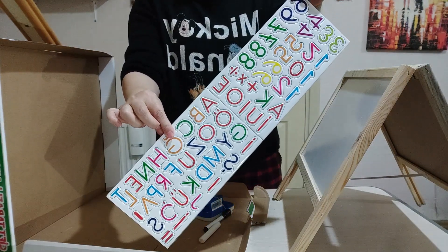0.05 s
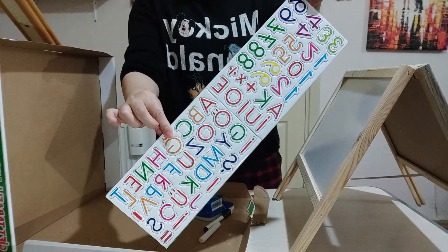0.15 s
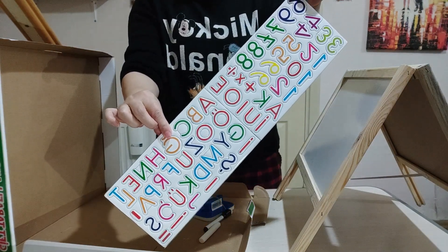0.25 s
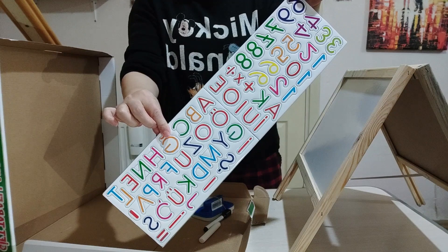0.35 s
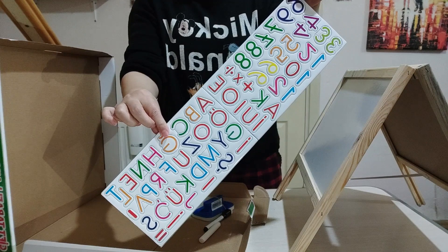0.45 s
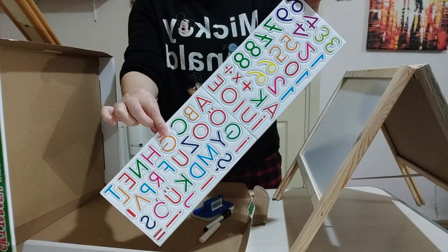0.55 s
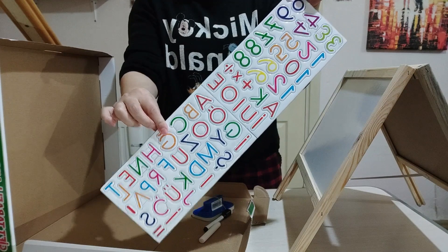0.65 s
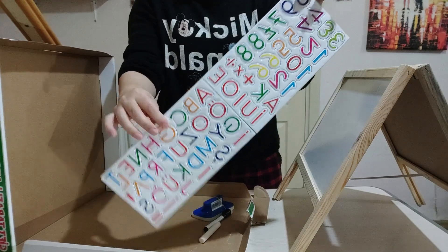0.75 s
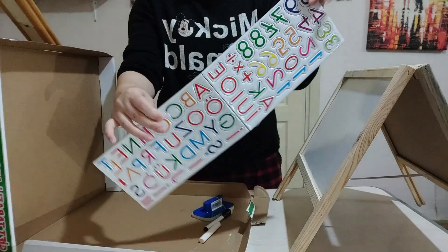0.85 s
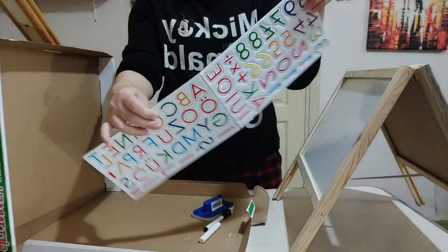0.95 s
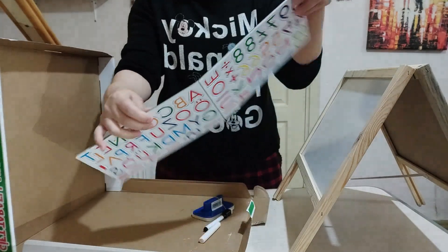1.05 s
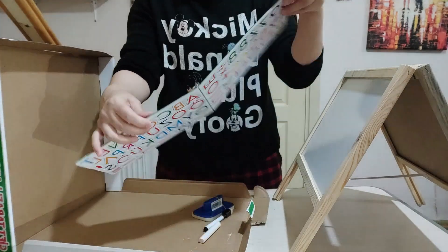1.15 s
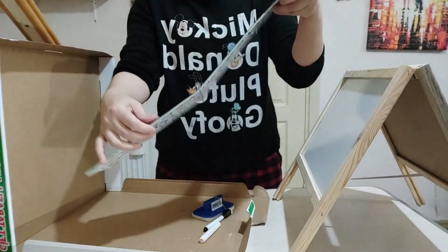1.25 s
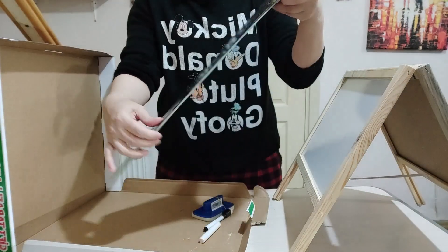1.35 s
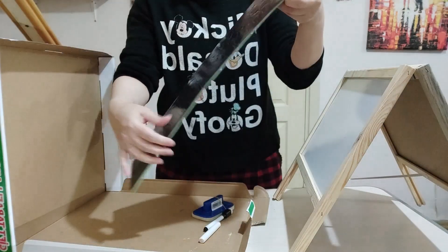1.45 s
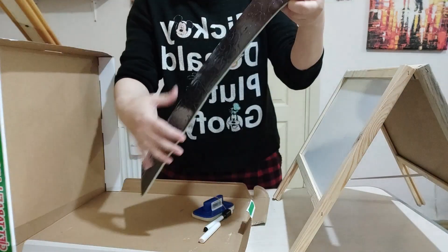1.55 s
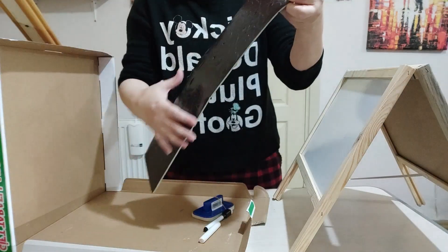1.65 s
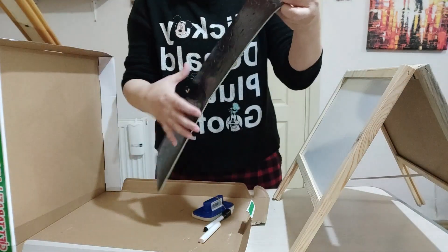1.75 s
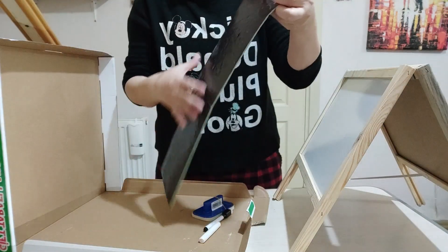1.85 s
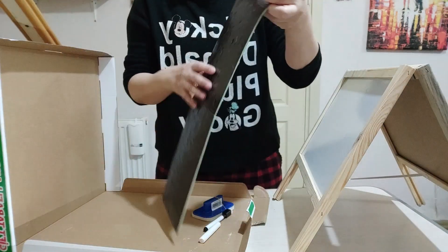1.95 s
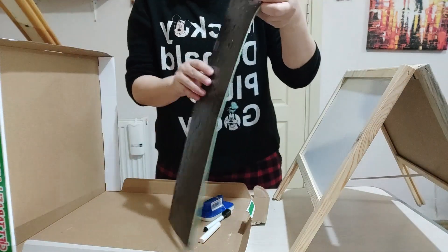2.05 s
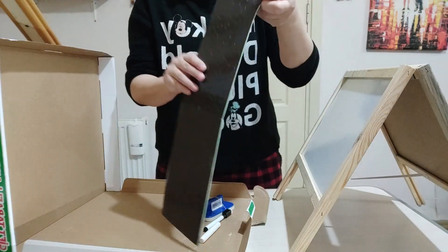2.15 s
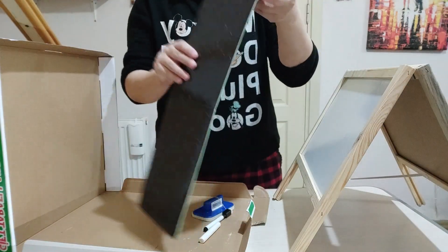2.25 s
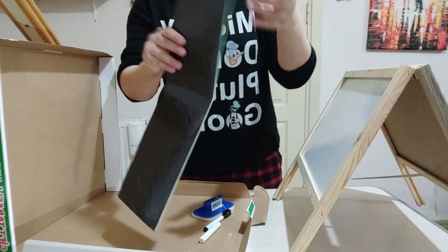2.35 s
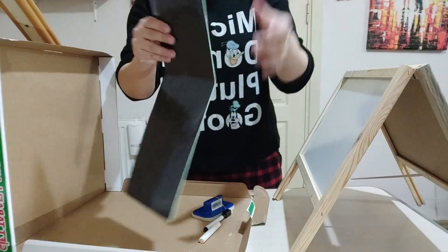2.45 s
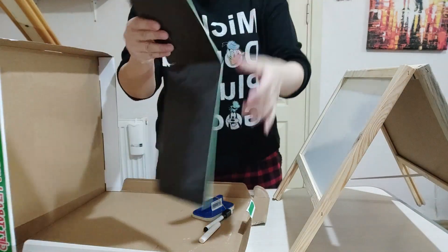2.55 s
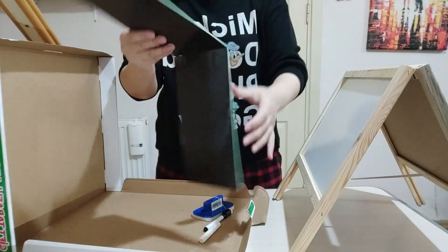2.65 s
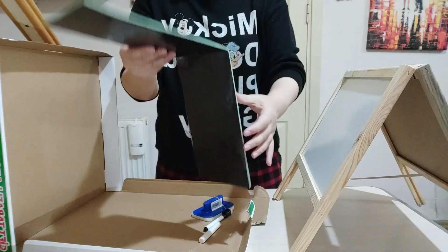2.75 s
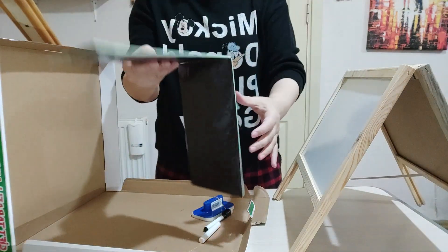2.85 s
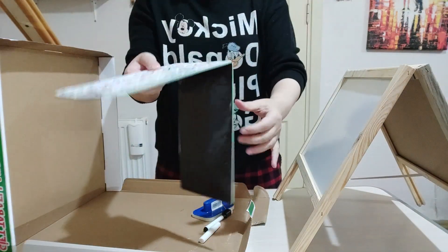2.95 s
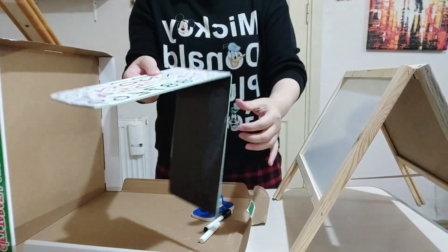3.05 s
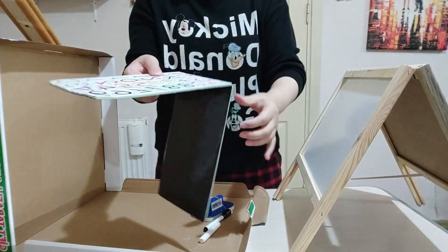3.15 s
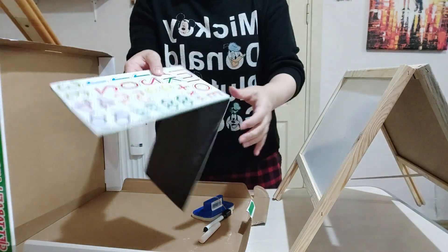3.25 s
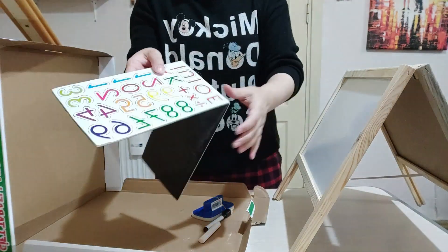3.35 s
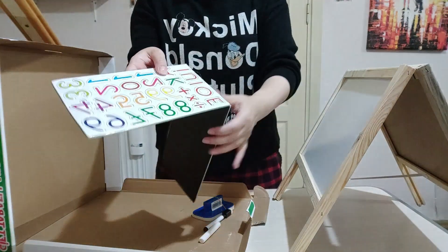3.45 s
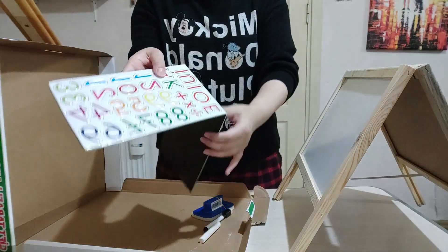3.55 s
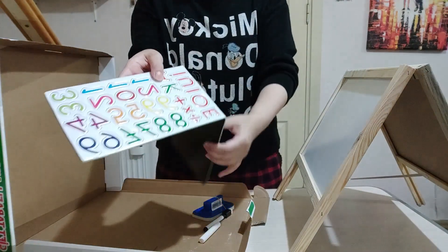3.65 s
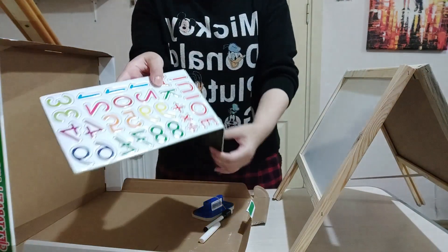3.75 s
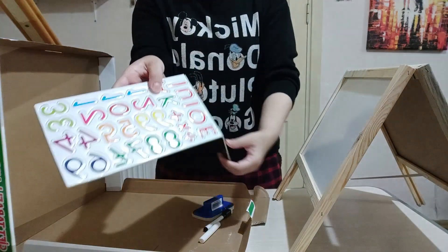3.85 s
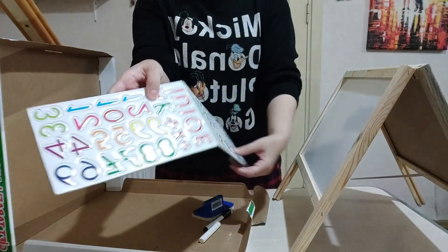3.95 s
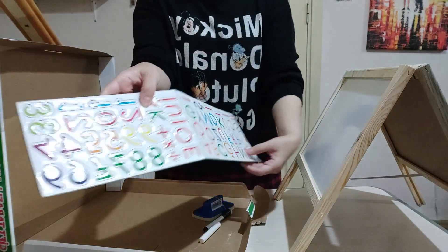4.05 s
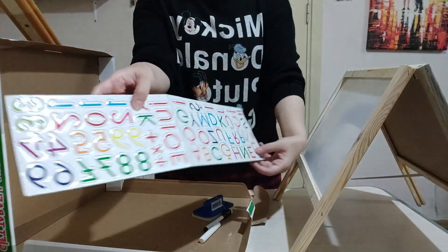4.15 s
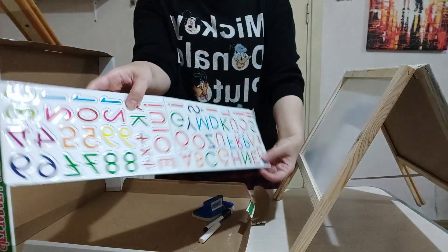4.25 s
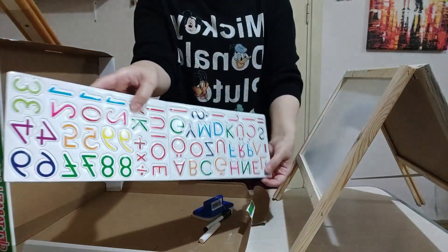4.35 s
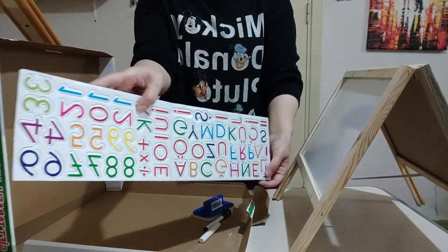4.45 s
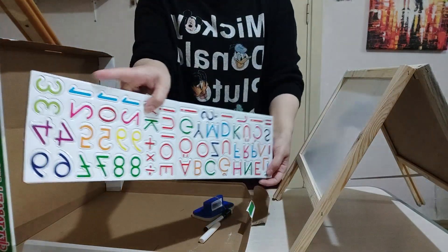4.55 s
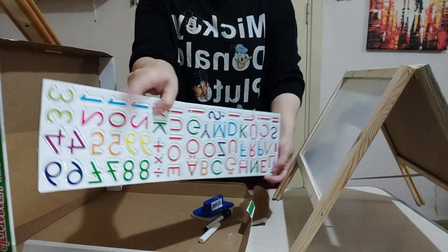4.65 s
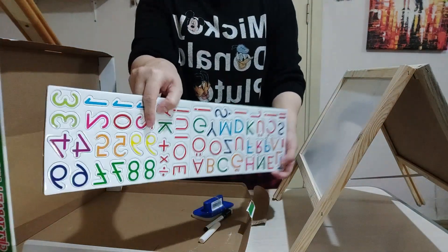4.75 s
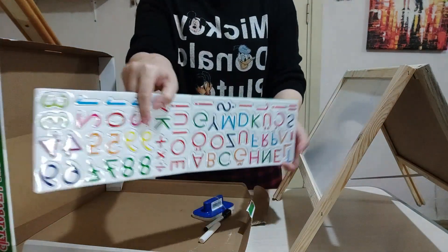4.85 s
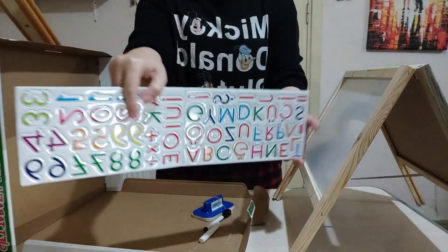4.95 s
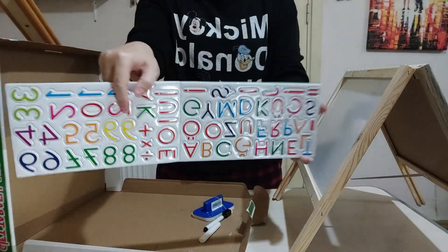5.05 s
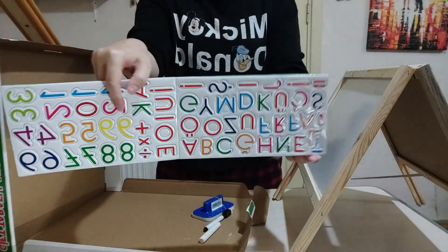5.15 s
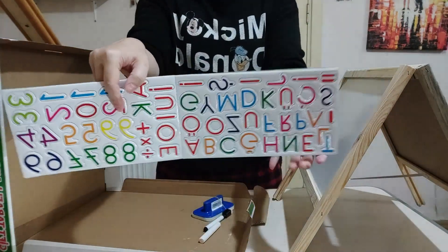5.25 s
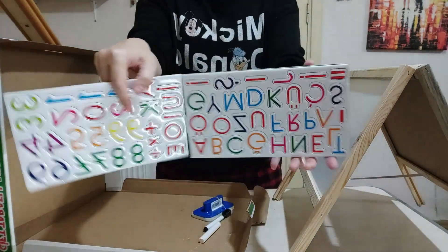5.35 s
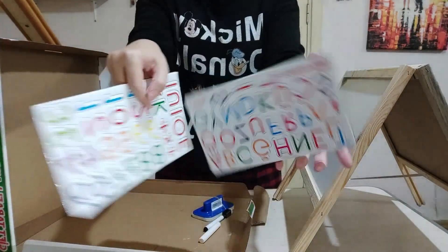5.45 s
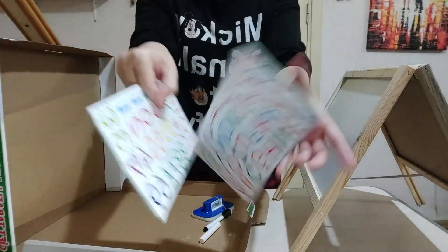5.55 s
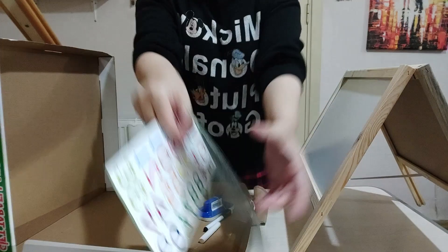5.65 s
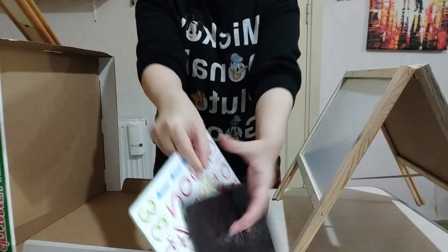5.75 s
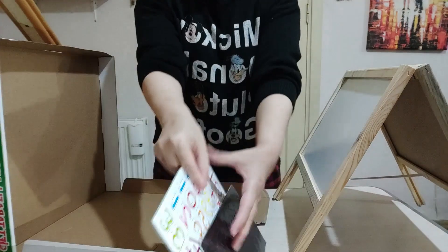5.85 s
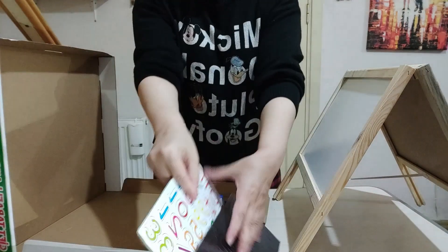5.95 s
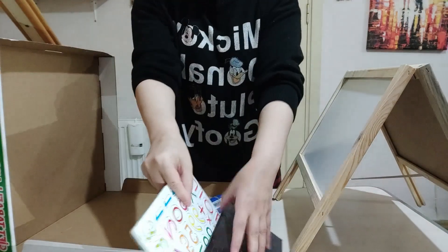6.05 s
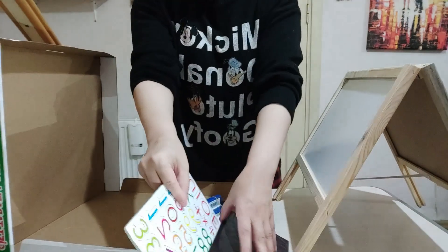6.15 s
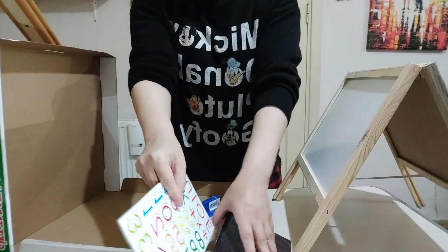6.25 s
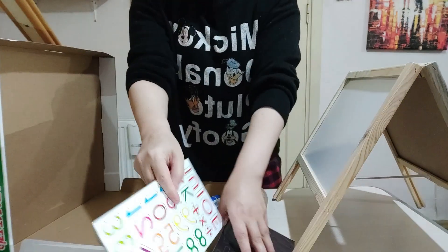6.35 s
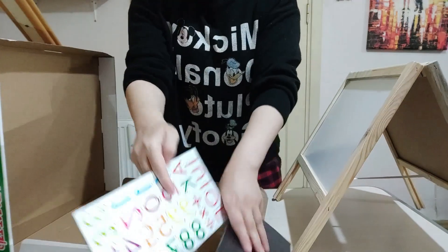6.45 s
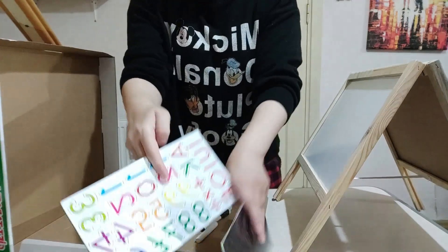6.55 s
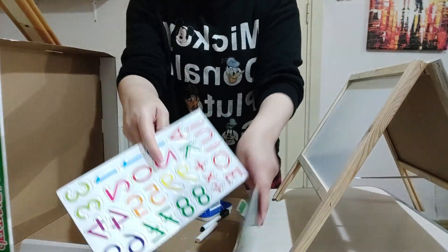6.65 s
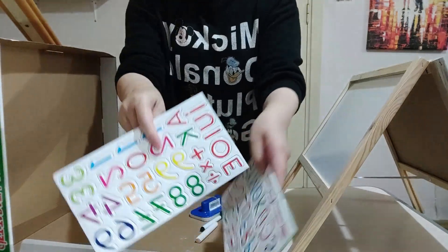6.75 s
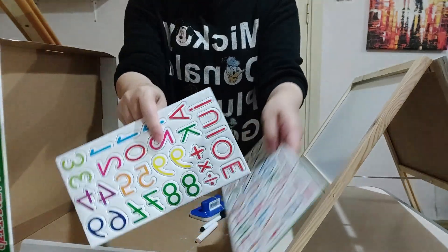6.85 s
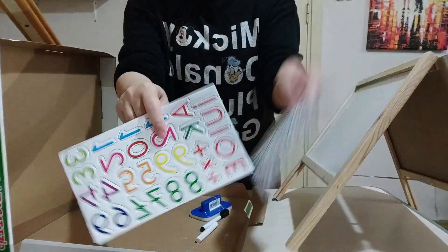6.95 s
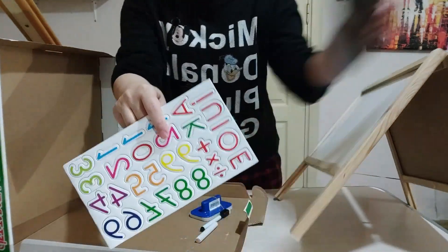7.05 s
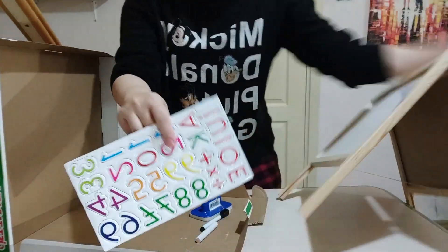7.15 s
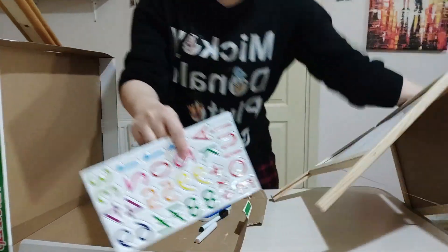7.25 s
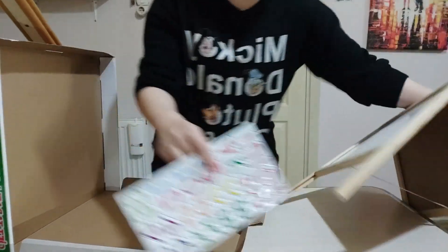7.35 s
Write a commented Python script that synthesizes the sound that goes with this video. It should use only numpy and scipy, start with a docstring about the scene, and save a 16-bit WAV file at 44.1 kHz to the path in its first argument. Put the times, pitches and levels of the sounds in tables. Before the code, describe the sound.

A small, quiet room with low air rumble, faint hiss and a barely audible wavering hum from about 2 s, heard through two closely spaced microphones. From 0.9 s fingers slide over a floppy magnetic sheet in thin, bright, very soft hisses, with tiny ticks around 2.1-3.4 s. From 4 s the rubbing becomes slightly busier, with a faint drag and a tiny high squeak near 4.6 s. At 5.43 s comes a crisp double tap with a soft thump. At 5.8-5.95 s the sheet meets the box: snappy taps, a short rasp and the deepest dull thuds. Softer rubbing, scrapes and brief squeaks continue from 6 to 6.8 s, with light taps near 6.75 s. After a lull, a soft bump at 7.07 s and knocks at 7.2 s lead to a strong thump at 7.33 s and a sharp, bright easel clack at 7.35 s, echoing briefly.

```python
"""You hear light taps and soft thumps, fingers hissing, an edge scraping, short squeaks, a knock and a clack.
Hands turn over a floppy magnetic sheet, set it down in a cardboard box on a table and shift a wooden easel.
Blows are short bursts of noise or fading tones; sliding is noise made of tiny slips; squeaks are gliding tones.
A small, quiet room answers with echoes over its rumble, hiss and a faint hum.
It is all heard through two closely spaced microphones."""
import sys
import numpy as np
from scipy import signal
from scipy.fft import rfft, irfft
from scipy.io import wavfile
from scipy.ndimage import uniform_filter1d

SR = 44100
rng = np.random.default_rng(int(sys.argv[2]) if len(sys.argv) > 2 else 0)


def unload_audio(sound):
    """Save the sound as a 16-bit wav file, at the path given as the first command line argument."""
    columns = np.transpose(np.atleast_2d(sound))
    # keep every value between -1 and 1, then stretch to whole-number steps
    steps = np.round(np.clip(columns, -1, 1) * 32767)
    wavfile.write(sys.argv[1], SR, steps.astype(np.int16))


N = 326340  # length of the scene in samples

# Light blows of sheet, fingers and easel. Each row: start in seconds, hollow clack level in dB,
# bright crack level in dB, crack tilt in dB per octave above 1000 Hz, crack decay in seconds,
# left-minus-right level in dB.
LIGHT_BLOWS = [(2.1259, -89, -59.5, -4.5, 0.0024, -1.5), (2.359, -71, -58, -6.5, 0.0027, -1),
               (2.7953, -85, -60.5, -3.5, 0.005, -1), (3.411, -58.5, -53.5, -5.5, .003, -2),
               (4.629, -67.5, -63, -5, 0.0036, -2), (4.717, -68, -70, -8, 0.0053, -2),
               (4.883, -69, -66, -3, 0.0093, 3), (4.923, -65, -62, 5, 0.0029, 0),
               (5.030, -64.5, -66, -2, 0.0033, -1), (5.311, -61.5, -64, -2, 0.0016, -3),
               (5.4258, -38.5, -38.5, 0.5, 0.00092, -4), (5.4455, -41.5, -45.5, -4, 0.00067, -3),
               (5.474, -71, -53, -3, 0.0052, 8), (5.509, -78, -56, 9, 0.0064, -8),
               (5.552, -59.5, -48.5, 4, .014, 0), (5.620, -66.5, -52.5, 3.5, 0.0035, -4),
               (5.657, -68, -51.5, 5, .01, -3), (5.7967, -37, -46.5, -3, 0.0049, -1),
               (5.8221, -39, -37, 2, 0.001, -5.5), (5.858, -71, -46.5, 10, 0.007, -4),
               (5.924, -52, -41, -7, 0.005, -2), (6.047, -52.5, -59, 5, 0.0071, -4),
               (6.116, -54.5, -61, 12, 0.0044, -5), (6.377, -57, -53, 6, 0.0071, -4.5),
               (6.623, -76, -58, 2, 0.0043, -8), (6.7276, -55, -70, 4, 0.0055, 1),
               (6.752, -50.5, -59, 2, 0.016, -1), (6.79, -47, -55, -9, 0.0044, -1),
               (7.057, -69, -49, -4.5, 0.01, -1), (7.101, -72, -45, -5.5, 0.041, -1),
               (7.1983, -41.5, -40, -1.5, 0.0074, 2.5), (7.2259, -53, -38, -0.5, 0.0045, 1),
               (7.322, -52, -42.5, 4, 0.0026, 2), (7.329, -39.5, -45.5, 5, 0.0093, -6.5),
               (7.3531, -46, -26.5, 12, 0.0015, -0.5), (7.356, -46, -49, -4, 0.001, -11),
               (7.366, -44, -49, 17, 0.0074, 2)]
# Spectra of the hollow clack and the bright crack. Each row: frequency in Hz, relative level in dB.
CLACK_SPECTRUM = [(150, -11), (400, -4.5), (750, -3), (1150, -4), (1900, -7), (2800, -8), (4500, -5.5),
                  (9000, -52)]
CRACK_SPECTRUM = [(1000, -17.5), (2500, -7.5), (3500, 0), (4800, 9.5), (6300, 1), (7900, 6), (9000, -6.5),
                  (13000, -15.5), (16000, -20)]
BLOW_S = 0.02  # a blow's level in dB is its energy spread over this many seconds
RATTLE, RATTLE_S = 0.19, 0.015  # chatter after a light blow: share of the start, decay in seconds

# Heavy, soft blows. Each row: start in seconds, level in dB, pitch of the flexing panel in Hz,
# decay in seconds, ring of box and table in dB against the flex (before ring_db is added),
# left-minus-right level in dB.
HEAVY_BLOWS = [(5.312, -62, 298, 0.0027, -19, 0), (5.4274, -39, 343, 0.0041, -21.5, 1.5),
               (5.735, -55, 154, 0.0087, -19, -2), (5.798, -35.5, 343, 0.0014, 1, 0.5),
               (5.890, -40, 195, 0.0082, -4.5, 3), (5.925, -25, 220, 0.0047, 4, -2),
               (5.951, -34.5, 165, 0.0098, 2.5, 6), (6.116, -51, 247, 0.014, 6, 5),
               (6.728, -56.5, 360, 0.01, -17, 4), (6.753, -61, 415, 0.0069, -10, 2),
               (7.071, -47.5, 381.7, 0.042, 2, 1.5), (7.204, -50, 432, 0.0047, 11, -0.5),
               (7.255, -45.5, 211, 0.017, 6, 0), (7.310, -43, 410, 0.0051, 4, 4),
               (7.328, -25.5, 226, 0.015, -23, 2.5), (7.3421, -25.5, 196, 0.0075, -9.5, 1.5)]
# Ring of box and table. Each row: frequency in Hz, relative level in dB, time to fall 60 dB in seconds.
BOX_RING = [(130, -1, 0.19), (150, 2, 0.089), (207, -1, 0.39), (234.6, -8.5, 0.26), (264.2, -7, 0.33),
            (327.4, -5.5, 0.26), (413.5, -10.5, 0.38), (463, -18.5, 0.45), (538, -12, 0.1),
            (615.6, -20, 0.22), (740, -17, 0.091), (837, -28.5, 0.36), (880, -26.5, 0.46)]
# How well a flexing panel gives off sound. Each row: frequency in Hz, gain in dB.
PANEL_RADIATION = [(30, -25), (80, -10.5), (130, -5), (400, 1.5), (700, 2.5), (1500, -13.5), (5000, -36)]

# Hard parts of the easel clacking together. Each row: start in seconds, level in dB,
# left-minus-right level in dB.
EASEL_CLACKS = [(7.3531, -30.5, 3), (7.3582, -39, -3), (7.364, -38, -7)]
# Ring of those parts. Each row: frequency in Hz, relative level in dB, time to fall 60 dB in seconds.
EASEL_RING = [(3500, -18, 0.06), (4400, -7, 0.027), (5771, -6, 0.028), (6950, -9, 0.06), (7400, -5, 0.036),
              (7823, -3, 0.045), (9540, -1.5, 0.02), (10290, -5, .022), (12000, -6, .04), (11960, -10, .04),
              (14000, -14, .03)]

# Shoves that drag an edge over cardboard or table. Each row: start in seconds, length in seconds,
# rasp level in dB, panel rumble level in dB (both before the rise and sag).
SHOVES = [(4.049, 0.87, -75.5, -73), (4.847, 0.083, -67, -64.5), (5.225, 0.088, -65.5, -65.5),
          (5.42, 0.16, -74, -60), (5.783, 0.083, -46.5, -41), (5.905, 0.029, -43, -35),
          (5.978, .08, -63, -45.5), (6.109, .18, -57.5, -51.5), (6.371, 0.11, -57.5, -59),
          (6.542, 0.21, -65.5, -62), (6.744, 0.086, -54, -55), (7.059, 0.16, -59.5, -54.5),
          (7.191, 0.06, -45.5, -41.5), (7.302, 0.042, -33, -36.5)]
# A shove bites at once and slows as it goes.
SHOVE_ATTACK_S, SHOVE_RELEASE_S, SHOVE_SAG_DB_PER_S = 0.013, 0.042, 6
# Spectra of the scraping edge and the shaken panels. Each row: frequency in Hz, relative level in dB.
RASP_SPECTRUM = [(200, -31), (550, 3.5), (950, 0), (1400, -6), (2000, -8.5), (2900, -7.5), (4500, -16),
                 (9000, -30)]
RUMBLE_SPECTRUM = [(30, -47), (80, -3), (125, -0.5), (170, -9), (250, 0), (420, -1), (600, -2), (1200, -41)]

# Strokes of the fingers over the sheet. Each row: start in seconds, length in seconds,
# level in dB (before the rise and sag).
STROKES = [(0.87, 0.16, -75), (1.03, 0.043, -60), (1.11, 0.08, -62.5), (1.23, 0.12, -65),
           (1.40, 0.41, -69.5), (1.96, 0.19, -67.5), (2.265, 0.093, -64), (2.75, 0.058, -66),
           (3.23, 0.068, -67), (3.34, 0.12, -69), (3.52, 0.19, -78.5), (3.67, .18, -70), (3.85, .25, -67),
           (4.105, 0.029, -54), (4.21, 0.035, -58.5), (4.34, 0.2, -71.5), (4.51, 0.12, -66),
           (4.69, 0.085, -71), (4.785, 0.14, -63.5), (4.875, 0.076, -61.5), (5.02, 0.21, -64.5),
           (5.21, 0.25, -65.5), (5.43, 0.083, -47.5), (5.53, 0.032, -62), (5.61, 0.039, -52),
           (5.70, 0.035, -58.5), (5.80, 0.13, -48), (6.0, .31, -56), (6.38, 0.13, -59.5), (6.55, 0.11, -57),
           (6.745, 0.049, -52.5), (6.87, 0.41, -71), (7.05, 0.085, -53), (7.185, .21, -53.5)]
# A stroke eases in, slows a little and dies away.
STROKE_ATTACK_S, STROKE_RELEASE_S, STROKE_SAG_DB_PER_S = 0.028, 0.033, 6
FINGERS_PAN_DB = -1.5  # left-minus-right level
# Spectrum of the rubbing skin. Each row: frequency in Hz, relative level in dB.
RUB_SPECTRUM = [(1000, -34.5), (2500, -17.5), (3300, -16), (4200, -8.5), (4900, -4.5), (5600, -9),
                (6500, -12.5), (8000, -9.5), (8900, -21.5), (12000, -26), (16000, -25)]

# Skin and sheet edge sticking and slipping, singing briefly. Each row: start in seconds,
# length in seconds, first pitch in Hz, last pitch in Hz, width of the tone in Hz, level in dB.
SQUEAKS = [(0.932, 0.04, 4230, 4370, 1500, -70.5), (2.759, 0.059, 5020, 5100, 600, -62.5),
           (4.496, 0.16, 4850, 4530, 250, -68.5), (4.613, 0.028, 4720, 4490, 302, -57.5),
           (5.288, 0.031, 4500, 4900, 700, -58.5), (6.106, 0.047, 5160, 4960, 150, -57),
           (6.112, 0.097, 937.6, 831, 118, -53.5), (6.287, 0.031, 5000, 5250, 400, -67),
           (6.298, 0.04, 2507, 2663, 34.7, -60.5), (6.30, 0.034, 913, 808, 110, -55),
           (6.375, 0.035, 870, 890, 130, -55.5), (6.623, 0.034, 4400, 4170, 300, -53.5),
           (6.692, 0.028, 4270, 4370, 600, -58.5), (6.744, 0.023, 810, 753, 120, -47.5),
           (6.78, 0.027, 4500, 4600, 447, -50)]

# First echoes off the table and the walls of the box. Each row: left delay in seconds,
# right delay in seconds, level in dB.
FIRST_ECHOES = [(.0013, .0009, -18.5), (.0031, .0036, -21), (.0054, .0051, -17.5)]
# How long the room rings. Each row: frequency in Hz, time to fall 60 dB in seconds.
ROOM_FADE = [(100, 0.28), (300, 0.24), (1000, 0.3), (2200, 0.3), (4500, 0.39), (8000, 0.35), (15000, 0.21)]
# How alike left and right are in the room's echoes. Each row: frequency in Hz, likeness (1 is identical).
ROOM_LIKENESS = [(100, 0.7), (300, 0.92), (600, 0.49), (1200, 0.16), (4000, 0)]

# A faint low hum that swells and fades. Each row: time in seconds, level in dB.
HUM_LEVEL = [(2.0, -79), (2.9, -76.5), (3.4, -80), (4.0, -76.5), (4.2, -64.5), (4.4, -73), (5.4, -67)]
# Spectrum of the room's air and microphone hiss. Each row: frequency in Hz, relative level in dB.
AIR_SPECTRUM = [(12, -20), (20, -1), (37, 1), (53, -12.5), (90, -11), (116, -14), (153, -17), (352, -26.5),
                (491, -27.5), (534, -28.5), (581, -29), (1100, -34), (2840, -37.5), (7730, -47.5),
                (15500, -43.5)]
AIR_DB = -59
# How alike left and right are in the air. Each row: frequency in Hz, likeness (1 is identical).
AIR_LIKENESS = [(60, 0.12), (150, 0.49), (380, 0.11), (950, 0.037), (2380, 0.02), (5980, 0.02),
                (15000, 0.01)]
EDGE_HZ = 15900  # the recorder's upper limit


def taps(clack_s=0.0016, snap=1.9, softness=0.25, hard_s=0.006):
    """Each contact is a dense, quickly damped ring, hollow below and crisp above; short ones snap, long ones swell."""
    out = np.zeros((2, N))
    t = np.arange(4096) / SR
    for s, clack_db, crack_db, tilt_db, decay_s, pan_db in LIGHT_BLOWS:
        low, high = rng.standard_normal((2, 2, len(t)))
        # the touched thing chatters on for a moment
        chatter = RATTLE * np.exp(-t / RATTLE_S)
        rise = 1 - np.exp(-t / (softness * decay_s))
        # one sharp click at the start, stronger when the crack is short
        click = snap * np.exp(1 - decay_s / hard_s) * (t == 0)
        clack = pair(low, ROOM_LIKENESS) * rise * (np.exp(-t / clack_s) + chatter) + click
        crack = high * rise * (np.exp(-t / decay_s) + chatter) + click
        hollow = amp(clack_db) * blow(colour(clack, CLACK_SPECTRUM))
        bright = amp(crack_db) * blow(colour(crack, CRACK_SPECTRUM, tilt_db))
        add(out, s, hollow + bright, pan_db)
    return out


def thumps(ring_db=1, swell_s=0.0018, buzz=0.4, buzz_hz=60):
    """A panel flexes briefly and passes its motion to box and table, whose loose joints roughen the ring."""
    out = np.zeros((2, N))
    t = np.arange(SR * 2 // 3) / SR
    ring = np.zeros(len(t))
    for hz, db, t60 in BOX_RING:
        # complex noise wobbles both the strength and the timing of the tone
        wobble = rng.standard_normal(256) + 1j * rng.standard_normal(256)
        shake = np.interp(t * buzz_hz, np.arange(256), wobble)
        rough_tone = ((1 + buzz * shake) * np.exp(2j * np.pi * hz * t)).imag
        ring += amp(db - 60 * t / t60) * rough_tone
    ring = amp(ring_db) * blow(ring * (1 - np.exp(-t / swell_s)))
    for s, db, hz, decay_s, box_db, pan_db in HEAVY_BLOWS:
        flex = blow(np.sin(2 * np.pi * hz * t) * np.exp(-t / decay_s))
        add(out, s, amp(db) * (flex + amp(box_db) * ring), pan_db)
    return out


def easel():
    """Hard parts meet and ring briefly, each tone reaching the two microphones in its own phase."""
    out = np.zeros((2, N))
    t = np.arange(SR // 5) / SR
    for s, db, pan_db in EASEL_CLACKS:
        ring = np.zeros((2, len(t)))
        for hz, mode_db, t60 in EASEL_RING:
            tone = np.sin(2 * np.pi * (hz * t + rng.random((2, 1))))
            ring += amp(mode_db - 60 * t / t60) * tone
        add(out, s, amp(db) * blow(ring), pan_db)
    return out


def dragging():
    """With each shove, coarse slips rasp at the edge and shake the panels beneath."""
    slips = friction(slips_per_s=500, spread_db=2.5, smooth=0.63, jerk_db=1.5, jerk_hz=50.73)
    grain = pair(patchy(slips, depth_db=4.0), ROOM_LIKENESS)
    shape = SHOVE_ATTACK_S, SHOVE_RELEASE_S, SHOVE_SAG_DB_PER_S
    rasp = slides([(s, length_s, db) for s, length_s, db, _ in SHOVES], *shape)
    rumble = slides([(s, length_s, db) for s, length_s, _, db in SHOVES], *shape)
    return evened(colour(grain, RASP_SPECTRUM)) * rasp + evened(colour(grain, RUMBLE_SPECTRUM)) * rumble


def fingers():
    """Skin sliding on the printed face: a fine, bright hiss that swells with each stroke."""
    slips = friction(slips_per_s=900, spread_db=0.0, smooth=1.0, jerk_db=-1.0, jerk_hz=76.5)
    hiss = evened(colour(patchy(slips, depth_db=3.5), RUB_SPECTRUM))
    strokes = slides(STROKES, STROKE_ATTACK_S, STROKE_RELEASE_S, STROKE_SAG_DB_PER_S)
    return hiss * strokes * amp([[FINGERS_PAN_DB / 2], [-FINGERS_PAN_DB / 2]])


def squeaks():
    """Sticking and slipping make an unsteady, gliding tone that swells and stops."""
    out = np.zeros((2, N))
    for s, length_s, first_hz, last_hz, width_hz, db in SQUEAKS:
        n = int(length_s * SR)
        # each slip comes a little early or late, which widens the tone
        noise = uniform_filter1d(rng.standard_normal((2, SR // 4)), size=24)[:, :n]
        jitter = noise * np.sqrt(2 * np.pi * width_hz / SR)
        glide = 2 * np.pi * np.linspace(first_hz, last_hz, n) / SR
        tone = np.sin(np.cumsum(glide + jitter, axis=1))
        add(out, s, amp(db) * evened(tone * signal.windows.tukey(n, 0.7)), 0)
    return out


def near_echoes(x):
    """Close surfaces return a few early copies, each delayed by a fixed time on each side."""
    out = x.copy()
    for left_s, right_s, db in FIRST_ECHOES:
        for side, delay_s in enumerate((left_s, right_s)):
            lag = max(round(delay_s * SR), 1)
            out[side, lag:] += amp(db) * x[side, :-lag]
    return out


def room(x, wet_db, gap_s=0.001):
    """Dense reflections of random sign, each band of pitch dying at its own speed."""
    signs = rng.choice([-1., 1.], (2, SR))
    reflections = signs * (rng.random((2, SR)) < 5000 / SR)  # about 5000 a second
    hz, t, z = signal.stft(pair(reflections, ROOM_LIKENESS), SR, nperseg=256)
    fade = amp(-60 * t / read(ROOM_FADE, hz)[:, None])
    tail = signal.istft(z * fade, SR, nperseg=256)[1]
    tail = tail * (np.arange(tail.shape[1]) > gap_s * SR)
    tail = tail / np.linalg.norm(tail[0])
    return x + amp(wet_db) * signal.fftconvolve(x, tail, axes=1)[:, :N]


def hum(hz=122, wander_hz=6):
    """A low tone of wavering pitch: smoothed noise pushes its frequency up and down."""
    drift = evened(uniform_filter1d(rng.standard_normal(N), size=3000))
    tone = np.sin(2 * np.pi * np.cumsum(hz + wander_hz * drift) / SR)
    return level(HUM_LEVEL) * evened(tone)


def air():
    """Steady low rumble of the room and faint microphone hiss, as shaped noise."""
    noise = rfft(pair(rng.standard_normal((2, N)), AIR_LIKENESS))
    gain = amp(read(AIR_SPECTRUM, np.fft.rfftfreq(N, 1 / SR)))
    return amp(AIR_DB) * evened(irfft(noise * gain, N))


def friction(slips_per_s, spread_db, smooth, jerk_db, jerk_hz):
    """Tiny slips of uneven size over a smooth hiss; the whole comes in jerks."""
    sizes = amp(spread_db * np.minimum(rng.exponential(1, N), 2))
    slips = sizes * (rng.random(N) < slips_per_s / SR) * rng.choice([-1., 1.], (2, N))
    jerks = np.interp(np.arange(N) / SR * jerk_hz, np.arange(N), rng.uniform(-1, 1, N))
    hiss = smooth * rng.standard_normal((2, N))
    return evened((evened(slips) + hiss) * amp(jerk_db * jerks))


def patchy(x, depth_db, size=512):
    """The contact point wanders, so different resonances stand out from moment to moment."""
    z = signal.stft(x.astype(np.float32), nperseg=size)[2]
    # random gains, smoothed over neighbouring pitches and then over time
    field = uniform_filter1d(rng.standard_normal(z.shape[1:]), size=4, axis=0)
    field = evened(uniform_filter1d(field, size=5, axis=1))
    gain = amp(depth_db * np.clip(field, -2, 2))
    return evened(signal.istft(z * gain, nperseg=size)[1][:, :N])


def slides(rows, attack_s, release_s, sag_db_per_s):
    """Gain over time of sliding movements: each eases in, sags steadily and dies away after its length."""
    power = np.zeros(N)
    t = np.arange(SR * 3 // 2) / SR
    for s, length_s, db in rows:
        rise = 1 - np.exp(-(t / attack_s) ** 2)
        fall = np.exp(-np.maximum(t - length_s, 0) / release_s)
        gain = rise * fall * amp(db - sag_db_per_s * t)
        part = power[round(s * SR):][:len(t)]
        part += gain[:len(part)] ** 2  # overlapping movements add as power
    return np.sqrt(power)


def colour(x, spectrum, tilt_db=0, size=2048):
    """Filters with a spectrum, tilted by dB per octave above 1000 Hz; nothing sounds before its cause."""
    hz = abs(np.fft.fftfreq(size, 1 / SR))
    tilt = tilt_db * np.log2(np.maximum(hz, 1000) / 1000)
    log_gain = np.log(amp(read(spectrum, hz) + tilt))
    # minimum phase: the filter responds as early as it can
    response = np.fft.ifft(np.exp(np.conj(signal.hilbert(log_gain)))).real[:size // 2]
    return signal.oaconvolve(x, response[None], axes=1)[:, :x.shape[1]]


def pair(x, likeness):
    """Blends two unrelated channels to a given likeness at each frequency."""
    a, b = rfft(x)
    same = np.clip(read(likeness, np.fft.rfftfreq(x.shape[1], 1 / SR)), -1, 1)
    mid = a * np.sqrt((1 + same) / 2)
    side = b * np.sqrt((1 - same) / 2)
    return irfft(np.array([mid + side, mid - side]), x.shape[1])


def add(mix, s, sound, pan_db):
    """Places a sound at time s, leaning left or right."""
    panned = sound * amp([[pan_db / 2], [-pan_db / 2]])
    part = mix[:, round(s * SR):][:, :sound.shape[-1]]
    part += panned[:, :part.shape[1]]


def amp(db):
    """Turns decibels into gain."""
    return 10 ** (np.asarray(db) / 20)


def evened(x):
    """Scales to an average strength (rms) of 1."""
    return x / np.sqrt(np.mean(x ** 2) + 1e-20)


def blow(x):
    """Scales a short sound to the energy of rms 1 over the length of one blow."""
    energy = np.mean(np.sum(x ** 2, -1))
    return x * np.sqrt(BLOW_S * SR / (energy + 1e-20))


def read(points, hz):
    """Reads a curve between its points on a log-frequency axis."""
    f, value = np.transpose(points)
    return np.interp(np.log(hz + 1), np.log(f + 1), value)


def level(rows):
    """Gain over time from a dB curve; as good as silent before its start."""
    s, db = np.transpose(rows)
    return amp(np.interp(np.arange(N) / SR, s, db, left=-200))


def scene():
    """Handling sounds in the room, over its quiet air and hum."""
    handling = near_echoes(taps() + easel() + dragging() + fingers()) + squeaks()
    panels = colour(thumps(), PANEL_RADIATION)
    return room(handling, wet_db=-5.5) + room(panels, wet_db=-5) + hum() + air()


def record(dry):
    """The recorder cuts off the highest treble with a steep low-pass filter."""
    low_pass = signal.firwin(511, EDGE_HZ, window=("kaiser", 9), fs=SR)
    return signal.oaconvolve(dry, low_pass[None], "same")


dry = scene()
out = record(dry)
unload_audio(out)
```